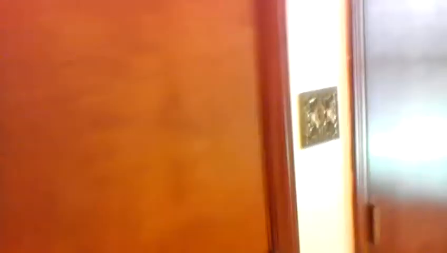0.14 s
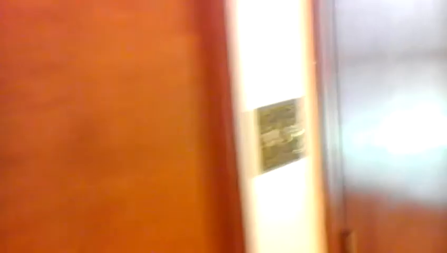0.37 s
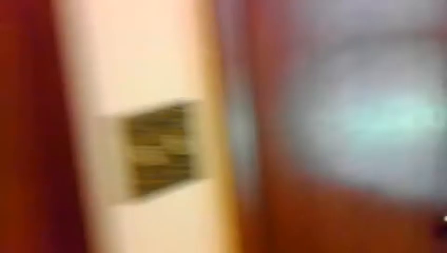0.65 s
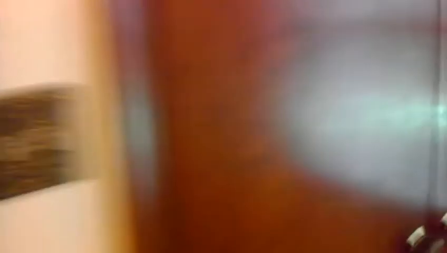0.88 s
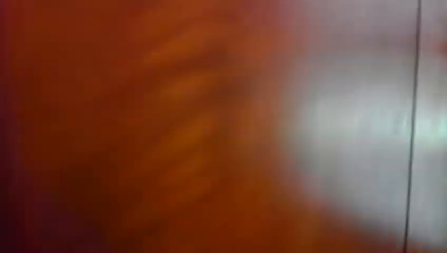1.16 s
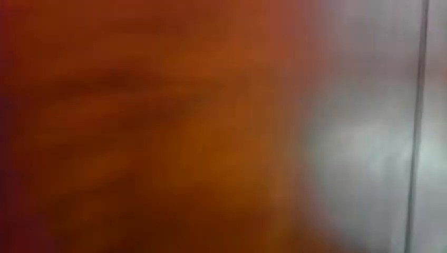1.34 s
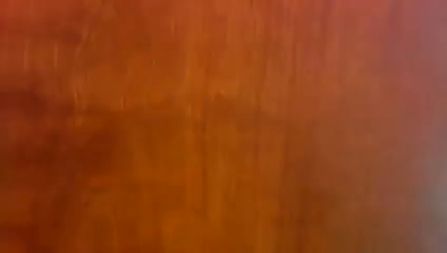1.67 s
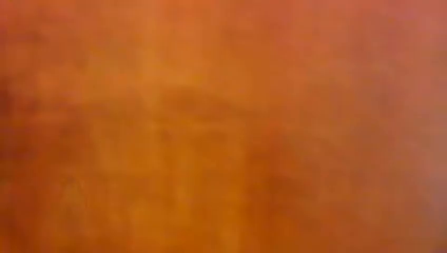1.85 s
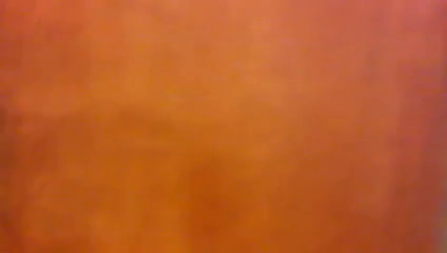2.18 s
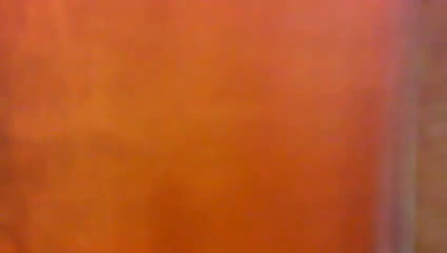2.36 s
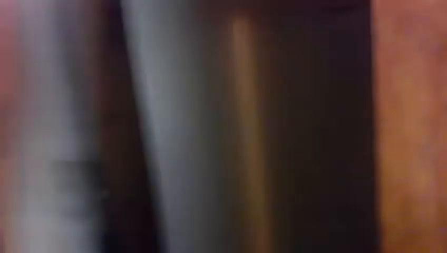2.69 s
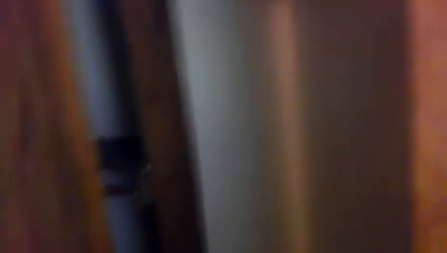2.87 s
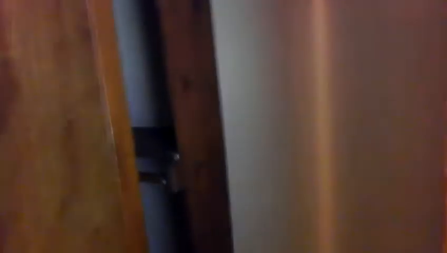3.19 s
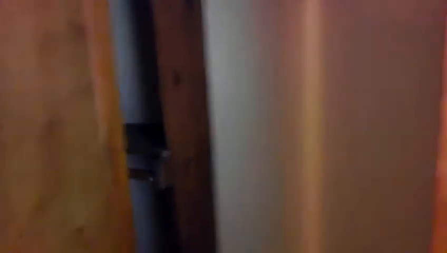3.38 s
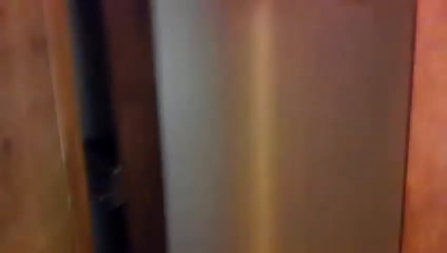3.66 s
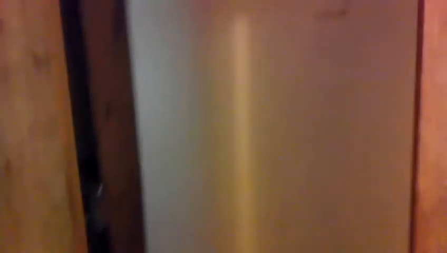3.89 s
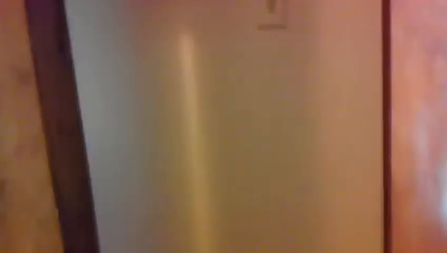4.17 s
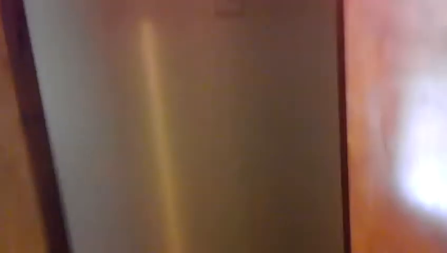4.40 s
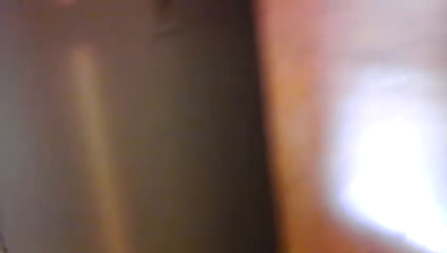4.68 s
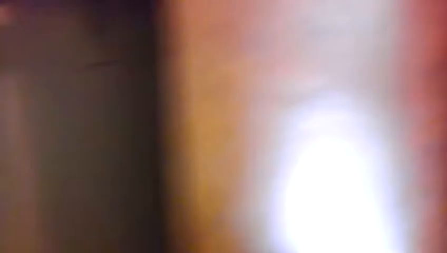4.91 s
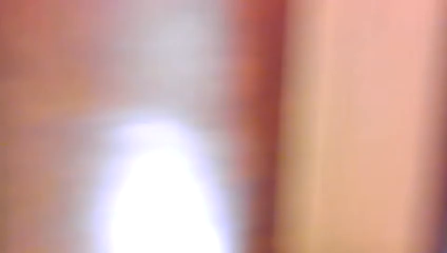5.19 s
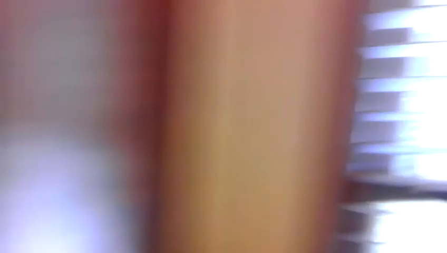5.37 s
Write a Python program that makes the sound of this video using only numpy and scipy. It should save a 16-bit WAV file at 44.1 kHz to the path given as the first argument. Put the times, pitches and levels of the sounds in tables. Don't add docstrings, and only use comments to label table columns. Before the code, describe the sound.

A small stereo microphone near a moving person in a hard-walled hallway. Faint hum, rustle and footsteps come first, then a metallic latch snap and clatter. More steps, three wooden bumps, and a very loud slam that distorts, its loose panel rattling on. Afterwards quiet handling, a lighter door tapping shut, and faint footsteps.

```python
import sys
import numpy as np
from scipy import signal
from scipy.fft import rfft, irfft
from scipy.io import wavfile
from scipy.ndimage import uniform_filter1d

SR = 44100
rng = np.random.default_rng(int(sys.argv[2]) if len(sys.argv) > 2 else 0)


def elevation(decibels):
    levels = np.asarray(decibels, float)
    return 10 ** (levels / 20)


def put_to_file(sound):
    columns = np.atleast_2d(sound).T
    safe = np.clip(columns, -1, 1)
    whole_steps = np.round(safe * 32767)
    wavfile.write(sys.argv[1], SR, whole_steps.astype(np.int16))


N = 244314

# pitch_hz, level_db
LOOSE_CRACK = [(800, -29), (1300, 2.5), (2200, 4), (3800, -7), (4500, -17), (8000, -24.5), (14000, -45)]


def evened(x):
    return x / np.sqrt(np.mean(x ** 2) + 1e-20)


def read(points, hz):
    f, value = np.transpose(points)
    return np.interp(np.log(hz + 1), np.log(f + 1), value)


def add(mix, s, sound):
    part = mix[round(s * SR):][:len(sound)]
    part += sound[:len(part)]


def slammed_door():
    # start_s, knock_db, thud_db, crack_db, ring_factor (on the decays)
    slam = [
        (2.1045, -3, -7, -2, 0.74),
        (2.111, -5, -15, -12.5, 0.43),
        (2.136, -19.5, -15, -20, 0.58),
        (2.152, -18.5, -12.5, -29, 0.68),
    ]
    # start_s, knock_db, thud_db, crack_db, ring_factor
    rattles = [
        (2.261, -29, -26, -27, 0.83),
        (2.269, -22.5, -31, -20, 0.92),
        (2.328, -28, -28.5, -22, 1),
        (2.393, -26, -46, -24, 0.54),
        (2.413, -26, -35, -43, 0.43),
        (2.45, -28, -32, -27.5, 0.36),
        (2.47, -41, -28, -32, 0.46),
        (2.509, -40, -51, -29, 0.6),
    ]
    # pitch_hz, level_db, t60_s
    modes = [(92.9, -16.5, 0.55), (153.3, -2.5, 0.21), (200, -4.5, 0.28), (248.2, 1, 0.25),
             (296, -2.5, 0.3), (387, -3, 0.15), (549, -8, 0.1), (691, -3.5, 0.034), (842, -4.5, 0.048),
             (1130, -3, 0.038), (1620, -2, 0.0083), (1920, -15.5, 0.027)]
    # pitch_hz, level_db
    frame_crack = [(800, -31.5), (1300, -4.5), (1900, -5), (2500, -6), (3300, -10.5), (4500, -18),
                   (6000, -21.5), (8000, -27), (14000, -42)]
    hit = blows(slam, modes, frame_crack, crack_s=0.0088, pan_db=-3.5, room_db=-9)
    return hit + blows(rattles, modes, LOOSE_CRACK, crack_s=0.0083, pan_db=-3.5, room_db=-4)


def bumped_door():
    # start_s, knock_db, thud_db, crack_db, ring_factor
    bumps = [
        (1.716, -24.5, -23, -30, 1),
        (1.8062, -9, -14, -17, 0.76),
        (1.821, -14, -19, -22, 0.54),
        (1.89, -31.5, -20.5, -22, 0.57),
        (1.9478, -8, -13.5, -12, 0.66),
        (1.981, -14, -24, -18, 0.38),
        (1.992, -21, -27, -19.5, 0.43),
    ]
    # pitch_hz, level_db, t60_s
    modes = [(91, -10.5, 0.28), (168.7, 0, 0.083), (217.3, -13, 0.27), (269, -10, 0.11),
             (400.9, -4.5, 0.11), (537, -4.5, 0.1), (810, 3.5, 0.024), (880, -5, 0.05), (1197, 4, 0.027)]
    # pitch_hz, level_db
    wood_crack = [(800, -17), (1300, -9), (1900, -4), (2700, -8), (3300, -10), (4200, -18), (6000, -21),
                  (8000, -24.5), (14000, -48.5)]
    return blows(bumps, modes, wood_crack, crack_s=0.0062, pan_db=2.5, room_db=-4.5)


def latch_door():
    # start_s, knock_db, thud_db, crack_db, ring_factor
    latch = [
        (.885, -40, -47, -52, 1.6),
        (.932, -26, -27, -41.5, 1.2),
        (.96, -9.5, -19.5, -2.5, 0.41),
        (.971, -15, -15, -14.5, 1.8),
        (.983, -20, -11.5, -13.5, 0.53),
        (1.004, -15.5, -22, -14, 0.3),
        (1.021, -17, -17.5, -24, 0.41),
        (1.037, -40, -18.5, -23, 0.53),
    ]
    # pitch_hz, level_db, t60_s
    modes = [(100, -12.5, 0.23), (178, 0.5, 0.12), (242, 4.5, 0.08), (295, -1, 0.08), (357.6, 10, 0.05),
             (447.6, 2.5, 0.059), (548, 1.5, 0.054), (800, -8, 0.089), (1130, -12, 0.1)]
    # pitch_hz, level_db
    metal_crack = [(800, -30.5), (1300, -9.5), (2000, -5.5), (2600, -3.5), (3100, -7.5), (3600, -11.5),
                   (4100, -17), (6500, -19), (7400, -25), (12100, -22), (14000, -29)]
    return blows(latch, modes, metal_crack, crack_s=0.0074, pan_db=-1.5, room_db=-0.5)


def light_door():
    # start_s, knock_db, thud_db, crack_db, ring_factor
    taps = [
        (3.87, -22, -21, -40, 1),
        (3.921, -35, -28.5, -46, 0.33),
        (4.047, -38, -34.5, -40, 0.55),
        (4.249, -26.5, -40, -47, 0.55),
        (4.271, -43, -43, -34, 0.69),
        (4.359, -38, -39.5, -43, 0.9),
    ]
    # pitch_hz, level_db, t60_s
    modes = [(140, -6, 0.089), (244, -9.5, 0.14), (303, -3.5, 0.1), (372, 7, 0.038), (508, 7, 0.042),
             (677, 5, 0.048), (837, -4, 0.13)]
    return blows(taps, modes, LOOSE_CRACK, crack_s=0.0033, pan_db=3, room_db=-4)


def swelling_tones():
    # peak_s, pitch_hz, level_db, width_s
    flexes = [
        (.971, 210, -16, 0.0092),
        (1.022, 215, -17, 0.0076),
        (2.19, 248.3, -21, 0.055),
        (3.878, 690, -28, 0.0046),
        (3.2, 161, -37, 0.0063),
        (3.256, 200, -45, 0.0031),
        (3.542, 125, -36.5, 0.0092),
        (3.599, 140, -37.5, 0.0064),
        (3.873, 390, -18, 0.0032),
        (5.132, 242, -37.5, 0.017),
    ]
    # peak_s, pitch_hz, level_db, width_s
    pings = [(.964, 3060, -12, 0.0026), (.963, 3400, -19, 0.0025), (.981, 2900, -21, .004),
             (1.003, 2750, -24, .003), (1.035, 1090, -20.5, 0.0043), (.986, 2100, -20, .002),
             (.998, 2150, -24, .003), (1.013, 1700, -21, .002), (1.06, 2260, -33, .002),
             (1.083, 2700, -33, .003), (1.118, 1650, -31, .003), (.669, 5970, -52, .004),
             (.887, 3150, -40, .0012), (.905, 9000, -52, .001), (4.362, 3900, -50, .003),
             (4.22, 1220, -42, .004), (0.38, 1040, -39, 0.0018), (2.1055, 2100, -11, .0012),
             (2.394, 2250, -32, .002), (2.474, 1780, -35, 0.0025), (2.63, 1100, -36.5, 0.0066),
             (2.66, 540, -37.5, 0.0072), (2.109, 6100, -23, .0015), (.984, 3280, -19, 0.0027),
             (1.811, 2400, -29, 0.0023), (1.813, 1900, -32.5, 0.0055), (1.893, 2640, -34, 0.002),
             (1.954, 1660, -23, 0.0058), (2.1062, 1550, -7, 0.0015), (2.1088, 1250, -12, .0012),
             (2.1032, 900, -14, .0005), (2.1085, 3000, -20, .001), (2.1365, 3500, -30, .002),
             (2.152, 2700, -29, .0015), (2.2745, 3800, -34, 0.003), (2.292, 3700, -41, .004),
             (2.2725, 1700, -30, .003), (2.262, 1250, -33, .002), (2.332, 2250, -33, .002),
             (2.394, 3900, -38, .0015), (2.4135, 1760, -36, .002), (2.426, 1750, -35, .002),
             (2.4495, 2300, -38, .0015), (2.512, 1900, -37, .002), (2.572, 1230, -39, .002),
             (2.589, 1150, -38, .002), (2.511, 3800, -41.5, 0.0034), (4.277, 2400, -42.5, 0.0056),
             (1.7185, 2900, -30, 0.0015), (1.722, 1220, -32, .004), (1.8105, 1200, -19, .002),
              (1.8085, 3800, -30, .001), (1.8085, 2700, -27, .0012), (1.833, 2400, -30, .004),
              (1.842, 1600, -29, .004), (1.9505, 2700, -26, .002), (1.9525, 3500, -28, .002),
              (1.9915, 3900, -29, .0012), (1.982, 5700, -30, .001), (1.986, 2400, -28, .002),
              (1.371, 800, -33, .0015), (1.4965, 1200, -33, .0015), (1.506, 1000, -35, .0015)]
    # peak_s, pitch_hz, level_db, width_s
    drones = [(1, 242, -30, 0.049), (1.1, 178, -30, .05), (1.16, 113, -35.5, .05), (1.39, 258, -40.5, 0.13),
              (1.46, 154.5, -36.5, .06), (1.4, 185, -36, .05), (1.75, 160, -26, 0.034),
              (1.87, 91.5, -27.5, 0.063), (1.89, 223, -36, .04), (1.827, 200, -15, .005),
              (1.855, 190, -19, .008), (1.958, 230, -17, .004), (1.968, 210, -16, .004),
              (2.001, 200, -19, .004), (2.24, 400, -31, .03), (2.0, 140, -22, 0.029), (2.06, 215, -30, .04),
              (2.17, 148, -22, 0.047), (2.2, 296, -23, .05), (2.16, 549, -27, 0.026),
              (2.15, 360, -24, 0.027), (2.14, 240, -27.5, 0.02), (2.35, 149, -31.5, .04),
              (2.42, 97, -36, 0.026), (2.57, 262, -41, 0.034), (2.79, 423.3, -43, .015),
              (4.75, 198, -53.5, 0.3), (1.08, 302, -31, .03), (1.255, 497, -41, .02),
              (1.381, 300, -31, 0.004), (1.336, 230, -36, .004), (1.245, 900, -37, .008),
              (1.62, 1220, -40, .006), (2.27, 1130, -33, .015), (2.635, 850, -37, .008),
              (1.54, 550, -41.5, .025), (2.3, 440, -34, .035), (2.4, 380, -35, 0.018),
              (2.52, 480, -44, .03), (3.19, 110, -46.5, 0.022), (3.22, 230.4, -49.5, 0.017),
              (3.57, 100, -50.5, .03), (3.9, 800, -40, .015), (3.78, 70, -57, .04)]
    out = np.zeros(N)
    for s, hz, db, width in flexes + pings + drones:
        u = np.arange(-3 * width, 3 * width, 1 / SR)
        add(out, s + u[0], elevation(db) * np.exp(-(u / width) ** 2) * np.cos(2 * np.pi * hz * u))
    return out


def struck_tones():
    # start_s, pitch_hz, level_db, length_s
    booms = [
        (2.104, 190, -1, .0055),
        (2.1106, 260, 1.5, .011),
    ]
    # start_s, pitch_hz, level_db, length_s
    favoured = [(.962, 620, -28, .025), (.966, 448, -26, .04), (.965, 242, -23, 0.086),
                (.97, 356.6, -21.5, .045), (1.808, 180, -22, .05), (1.81, 830, -32, .03),
                (1.811, 450, -29, .03), (1.95, 438, -25, 0.028), (1.951, 827, -28, .03),
                (1.95, 270, -23, 0.032), (2.105, 679, -18, 0.019), (2.108, 386, -14.5, .025),
                (3.872, 550, -31, .02), (4.262, 850, -40, .02), (4.355, 850, -41, .015),
                (.97, 520, -22, .02)]
    out = np.zeros(N)
    for s, hz, db, length in booms + favoured:
        u = np.arange(0, 2 * length, 1 / SR)
        add(out, s, elevation(db) * np.exp(-(u / length) ** 3) * np.sin(2 * np.pi * hz * u))
    return out


def footsteps():
    # start_s, knock_db, thud_db, crack_db, ring_factor
    steps = [(.383, -32, -40.5, -36, 0.51), (.596, -29, -31, -33, 0.4), (.669, -46, -51, -48, 0.78),
             (.739, -49, -49, -62, 0.78), (1.237, -29, -27.5, -33, 0.43), (1.369, -29.5, -42, -35.5, 0.44),
             (1.495, -28, -43, -34, .43), (1.615, -29.5, -36.5, -38.5, 0.53),
             (3.075, -57.5, -64.5, -53, 0.68), (4.693, -40, -59.5, -46.5, 0.45),
             (5.042, -45, -55, -44, 0.55), (5.075, -44, -54, -50, .6), (5.363, -40, -40.5, -53, 0.85)]
    # pitch_hz, level_db, t60_s
    modes = [(76.5, -16, 0.03), (111, -2.5, 0.055), (161, 3.5, 0.045), (234, 5.5, 0.051), (435, 7.5, 0.036),
             (690, 2, 0.042), (1033, 4.5, 0.037)]
    return blows(steps, modes, LOOSE_CRACK, crack_s=0.0069, pan_db=1.5, room_db=-2)


def blows(rows, modes, colour, crack_s, pan_db, room_db):
    t = np.arange(SR // 2) / SR
    near, far = np.zeros(N), np.zeros((2, N))
    hz, db, t60 = np.repeat(np.transpose(modes), repeats=3, axis=1)[:, :, None]
    middle = hz[:, 0] > 400
    spread = np.where(hz > 400, 0.036, 0.014)
    crack_colour = elevation(read(colour, np.fft.rfftfreq(len(t), 1 / SR)))
    for k, (s, knock_db, thud_db, crack_db, ring) in enumerate(rows):
        spot = rng.standard_normal((2, len(hz), 1))
        decay = elevation(db + 3.3 * spot[0] - 60 * t / (t60 * ring))
        rings = decay * np.sin(2 * np.pi * hz * (1 + spread * spot[1]) * t)
        rings *= 1 - np.exp(-t * hz / 1.5)

        fade = np.exp(-t / (2 * crack_s * ring))
        burst = rfft(rng.standard_normal(len(t)) * fade ** 2)
        even = np.exp(1j * np.angle(burst))
        crack = irfft(even * crack_colour, len(t))
        crack *= fade * (1 - np.exp(-t / 0.00087))

        parts = rings[middle].sum(0), rings[~middle].sum(0), crack
        levels_db = knock_db, thud_db, crack_db
        sound = sum(elevation(level) * p / abs(p).max() for level, p in zip(levels_db, parts))
        add(near, s, sound)
        add(far[k % 2], s, elevation(room_db) * sound)
    pan = elevation(np.array([[pan_db], [-pan_db]]) / 2)
    return pan * housing(near) + hall(far[0]) + hall(far[1])


def housing(x):
    size = 2048
    scatter = rng.standard_normal(size) * np.exp(-np.arange(size) / SR / 0.00036)
    direct = np.ones((size // 2 + 1, 1))
    turned = np.exp(1j * np.angle(rfft(scatter)))[:, None]
    ports = pair(direct, turned, np.fft.rfftfreq(size, 1 / SR))
    ports = np.roll(irfft(ports[:, :, 0], size), size // 2, axis=1)
    return signal.oaconvolve(x[None], ports, axes=1)[:, size // 2:][:, :N]


def hall(x):
    # pitch_hz, t60_s
    decay = [(60, 0.7), (150, 0.79), (300, 0.25), (700, 0.52), (1500, 0.4), (3000, 0.36), (6000, 0.38),
             (12000, 0.15)]
    taps = np.zeros((2, SR))
    at = np.arange(130, SR - 20, 20) + rng.integers(0, 20, (2, (SR - 131) // 20))
    np.put_along_axis(taps, at, rng.choice([-1., 1.], at.shape), 1)
    hz, t, z = signal.stft(taps, SR, nperseg=512)
    fade = elevation(-60 * t / read(decay, hz)[:, None])
    tail = signal.istft(pair(*z, hz) * fade, SR, nperseg=512)[1]
    return signal.fftconvolve(x[None], tail / np.linalg.norm(tail[0]), axes=1)[:, :N]


def pair(a, b, hz):
    # pitch_hz, likeness (-1..1)
    likeness = [(30, 0.26), (70, 0.98), (150, 0.92), (300, 0.9), (600, 0.78), (1100, 0.33), (2300, 0.29),
                (6000, 0.09), (13900, 0.31)]
    # pitch_hz, level_db
    balance = [(60, -2.5), (230, 0.5), (910, -1.5), (3570, -3.5), (13900, -0.5)]
    same = read(likeness, hz)[:, None]
    lean = elevation(read(balance, hz) / 2)[:, None]
    alike = np.sqrt((1 + same) / 2)
    apart = np.sqrt((1 - same) / 2)
    return np.array([(alike * a + apart * b) * lean, (alike * a - apart * b) / lean])


def swell(t, peak_s, db, rise_s, fall_s):
    away = np.where(t < peak_s, (peak_s - t) / rise_s, (t - peak_s) / fall_s)
    return elevation(2 * (db - 20 * away))


def rustle():
    # pitch_hz, level_db (per Hz)
    spectrum = [(15, -76), (25, -31.5), (81, -19.5), (94, -24.5), (117, -9.5), (141, -0.5), (246, -2),
                (304, -7), (367, -8.5), (532, -12), (1090, -10), (1760, -20.5), (2500, -23), (4000, -29),
                (6660, -35.5), (13300, -34.5), (15500, -38.5)]
    # time_s, level_db
    movement = [(0, -48), (.42, -47), (.6, -52), (.73, -47), (1.7, -48), (2.55, -51), (2.88, -57),
                (3.06, -66.5), (3.08, -52.5), (3.28, -62), (3.8, -51), (4.45, -50), (4.55, -62),
                (4.67, -56.5), (4.71, -49), (5.1, -49), (5.24, -58), (5.54, -49)]
    # peak_s, level_db, rise_s, fall_s, brightness (-1..1)
    strokes = [(.39, -51, 0.12, 0.065, -0.44), (.9, -37, 0.077, 0.049, 0.4),
               (0.946, -33.5, 0.072, 0.03, 0.37), (1.09, -29.5, .1, 0.22, -0.12),
               (1.22, -41.5, 0.066, 0.19, -1), (1.529, -41, 0.46, 0.15, -0.16),
               (1.896, -39, 0.066, .06, -0.65), (1.979, -26, 0.02, 0.069, 0.54),
               (2.26, -33.5, .15, 0.37, -0.39), (2.42, -39, 0.26, 0.12, -1),
               (2.64, -35.5, 0.28, 0.16, 0.22), (2.799, -39, 0.13, 0.13, 0.25),
               (3.1, -54.5, 0.029, 0.25, 0.51), (3.4, -58, 0.46, 0.6, 0.38), (3.92, -44, 0.11, 0.44, 0.13),
               (4.06, -46, 0.075, 0.32, 0.39), (4.23, -38, 0.1, 0.26, 0.28),
               (4.375, -40.5, 0.25, 0.07, 0.32), (4.82, -59, 0.085, 0.27, -0.12),
               (5.05, -52.5, 0.074, 0.076, 0.99), (5.075, -52, .02, 0.036, 1), (3.77, -54, .1, 0.2, 0.91),
               (5.36, -47.5, 0.18, 0.45, 0.17)]
    # peak_s, level_db, rise_s, fall_s
    shudders = [(.02, -46.5, 0.14, 0.16), (.726, -48, 0.3, 0.16), (1.112, -32, .1, 0.23),
                (1.338, -39.5, 0.4, 1), (1.725, -44, 0.028, .25), (1.957, -23.5, 0.028, 0.17),
                (2.25, -31.5, 0.33, 0.53), (2.576, -46, 0.09, 0.07), (3.194, -48, 0.09, 0.17),
                (3.6, -53, 0.15, 0.15), (3.77, -48.5, .1, .1), (4.368, -46.5, .2, 0.097),
                (4.68, -50.5, 0.43, .2), (5.042, -50, .05, 0.57), (5.358, -45, 0.22, 0.3)]
    calm_db, ranges_db, follow = -49.5, (-55.5, -49.5, -55.5, -61), (1.6, 1.15, 1.19, .9)
    stroke_db, bright_db = (-23.5, -0.15, -7.5, -21.5), (-7, -3.5, 5.5, 17)

    grain_gain = elevation(1.9 * np.minimum(rng.exponential(1, (2, N)), 5))
    grains = 1 + grain_gain * (rng.random((2, N)) < 900 / SR)
    hz, t, z = signal.stft(rng.standard_normal((2, N)) * grains, SR, nperseg=1024)
    patches = rng.standard_normal(z.shape[1:])
    patches = evened(uniform_filter1d(uniform_filter1d(patches, size=9, axis=0), size=5, axis=1))

    busy_db = np.interp(t, *np.transpose(movement)) - calm_db
    power = elevation(2 * (np.array(ranges_db)[:, None] + np.outer(follow, busy_db)))
    for *shape, bright in strokes:
        gain_db = np.array(stroke_db) + bright * np.array(bright_db)
        power = power + np.outer(elevation(2 * gain_db), swell(t, *shape))
    power[0] += sum(swell(t, *row) for row in shudders)

    colour = elevation(read(spectrum, hz))
    ranges = np.digitize(hz, (300, 1500, 5000))
    colour_power = np.array([(colour[ranges == k] ** 2).sum() for k in range(4)])
    field_db = 10 * np.log10(power) - 10 * np.log10(colour_power)[:, None]
    field_db = uniform_filter1d(field_db[ranges], size=3, axis=0) + 1.8 * patches
    z = pair(*z, hz) * colour[:, None] * elevation(field_db) * np.sqrt(len(hz) / np.mean(grains ** 2))
    return signal.istft(z, SR, nperseg=1024)[1][:, :N]


def hinge_squeaks():
    # start_s, length_s, pitch_hz, level_db
    squeaks = [
        (.566, 0.026, 8520, -58),
        (0.699, 0.054, 8600, -53.5),
    ]
    sag_hz_per_s = 2000
    out = np.zeros(N)
    for s, length, hz, db in squeaks:
        u = np.arange(0, length, 1 / SR)
        wobble = 1 + .006 * evened(uniform_filter1d(rng.standard_normal(len(u)), size=60))
        tone = np.sin(2 * np.pi * np.cumsum((hz - sag_hz_per_s * u) * wobble) / SR)
        add(out, s, elevation(db) * tone * np.hanning(len(u)))
    return out


def appliance_hum():
    # time_s, level_db
    loudness = [
        (0, -54),
        (.48, -49.5),
        (.56, -62),
        (3.2, -65.5),
        (5.54, -61.5),
    ]
    waver = 1 + 0.02 * evened(uniform_filter1d(rng.standard_normal(N), size=3000))
    level = elevation(np.interp(np.arange(N) / SR, *np.transpose(loudness)))
    return level * np.sin(2 * np.pi * np.cumsum(118 * waver) / SR)


def scene():
    doors = slammed_door() + bumped_door() + latch_door() + light_door()
    doors += swelling_tones() + struck_tones()
    deep_cut = signal.butter(2, 62, "high", fs=SR, output="sos")
    doors = signal.sosfilt(deep_cut, doors)
    return doors + footsteps() + rustle() + hinge_squeaks() + appliance_hum()


def treble_loss(x):
    # start_s, end_s, edge_hz
    dull = [(0.342, 0.402, 12400), (0.97, 1.178, 12200), (1.202, 1.303, 12400), (1.737, 1.93, 12600),
            (1.826, 1.862, 4100), (1.816, 1.872, 8000), (1.871, 1.896, 11070), (1.962, 2.09, 11700),
            (2.083, 2.097, 6640), (2.114, 2.707, 11740), (2.157, 2.39, 8800), (2.188, 2.26, 6250),
            (2.268, 2.318, 6850), (2.358, 2.378, 8200), (2.39, 2.42, 9500), (2.44, 2.49, 10600)]
    top_hz, edge_hz_per_s, ragged_hz = 14150, 980000, 450
    hole_share, holes_below_hz = 0.11, 5100
    hz, t, z = signal.stft(x, SR, nperseg=512)
    hz_column = hz[:, None]
    dips = [low + edge_hz_per_s * np.maximum(np.maximum(start - t, t - end), 0) for start, end, low in dull]
    lowest = np.min(dips, axis=0)
    short = lowest < top_hz
    over_hz = hz_column - np.minimum(lowest, top_hz)

    frame = (t * SR // 1024).astype(int)
    band = (hz // 700).astype(int)
    jitter = rng.uniform(-1, 1, frame[-1] + 1)[frame]
    over_hz = over_hz + ragged_hz * np.where(short, 1, .25) * jitter

    luck = rng.random((band[-1] + 1, frame[-1] + 1))[band][:, frame]
    risk = hole_share * short * np.exp(over_hz / holes_below_hz) * (hz_column > 6300)
    kept = np.clip((luck - risk) * 50 + 1, 0, 1)
    edge = np.clip(.5 - over_hz / 200, 0, 1)
    return signal.istft(z * kept * edge, SR, nperseg=512)[1][:, :N]


def low_pass(x):
    return signal.sosfilt(signal.butter(12, 14540, fs=SR, output="sos"), x)


def record(dry):
    low_cut = signal.butter(3, 50, "high", fs=SR, output="sos")
    clipped = np.clip(signal.sosfilt(low_cut, dry), -1, 1)
    return low_pass(treble_loss(clipped))


dry = scene()
out = record(dry)
put_to_file(out)
```